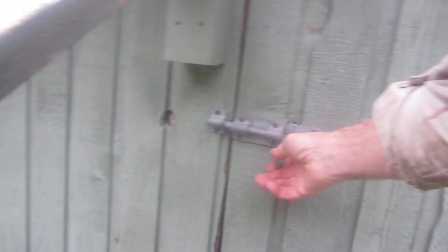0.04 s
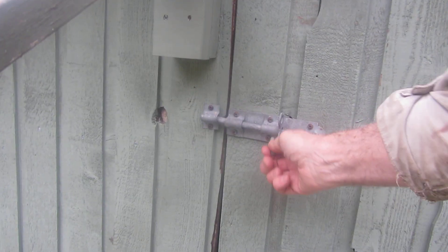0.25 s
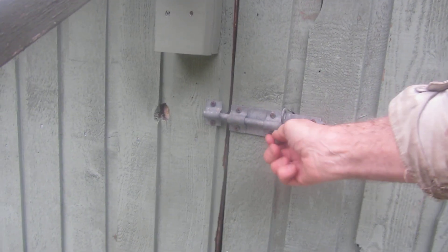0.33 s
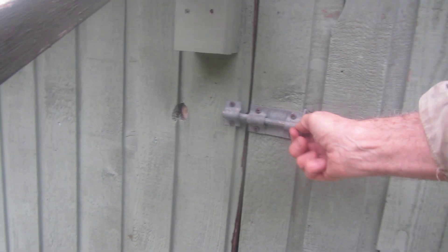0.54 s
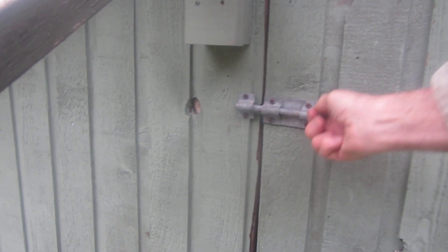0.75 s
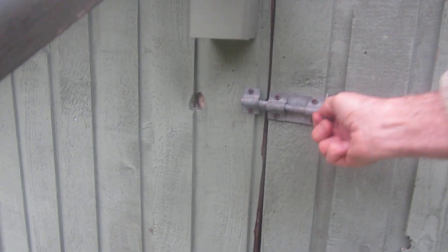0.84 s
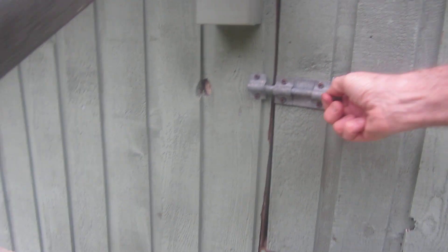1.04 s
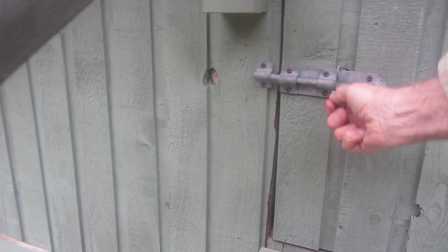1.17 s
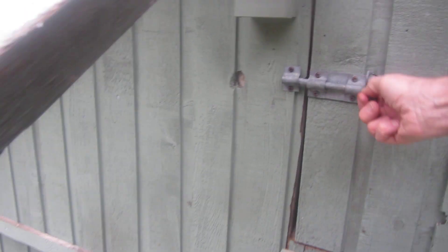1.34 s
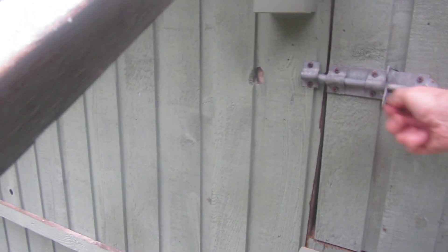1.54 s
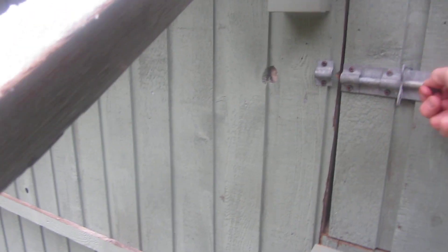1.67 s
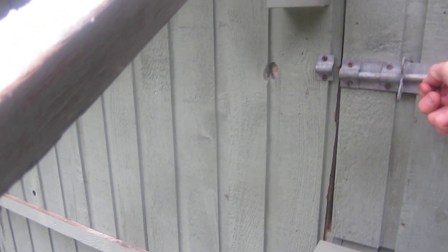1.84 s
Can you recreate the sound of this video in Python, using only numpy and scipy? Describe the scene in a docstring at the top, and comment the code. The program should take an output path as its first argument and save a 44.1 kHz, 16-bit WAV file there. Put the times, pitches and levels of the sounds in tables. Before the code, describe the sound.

A metal slide bolt is worked back by hand on a wooden door outdoors, heard close. It clacks, rattles and scrapes unevenly with tiny squeaks, then ends in a few sharp clicks. The door thuds softly over faint hiss.

```python
"""Outdoors, close to a wooden door: a steel slide bolt is worked back by hand.
The bolt knocks and chatters in its housing and scrapes in tiny slips between knocks. It squeaks
and groans where it binds, pings where it strikes. Knocks and scrape ring the bolt and its board.
The door rumbles under the tugging hand and thuds in its frame. Faint hiss behind."""
import sys
import numpy as np
from scipy import signal
from scipy.io import wavfile

SR = 44100
rng = np.random.default_rng(int(sys.argv[2]) if len(sys.argv) > 2 else 0)


def wrap_up_sound(samples):
    """Save the sound to the file named by the first command line argument, as 16-bit audio."""
    columns = np.atleast_2d(samples).T
    # keep every value between -1 and 1, then stretch to whole-number steps
    tamed = np.clip(columns, -1, 1)
    steps = np.round(tamed * 32767).astype(np.int16)
    wavfile.write(sys.argv[1], SR, steps)


N = 83790
TIME_S = np.arange(N) / SR

# bolt strikes housing: start_s, contact_s, wood_db, clack_db, steel_db, tick_db, top_db
KNOCKS = [(0.2036, 0.0015, -23.5, -26.5, -34, -32, -44), (0.212, 0.024, -29.5, -13, -75, -41, -62),
          (0.2319, 0.0024, -33.5, -13.5, -19, -20, -48), (0.249, 0.0027, -57, -30, -48, -26.5, -37),
          (0.282, 0.011, -50, -26, -36, -57, -64), (0.2988, 0.006, -36.5, -16, -18.5, -35.5, -61),
          (0.375, 0.0021, -25.5, -39, -76, -59, -63), (0.3912, 0.003, -39, -22.5, -27, -49, -47),
          (0.5016, 0.00053, -20.5, -34, -33, -29, -32), (0.519, 0.004, -26.5, -13.5, -40, -39, -42),
          (0.5249, 0.0013, -50, -15.5, -18.5, -22.5, -45), (0.537, 0.003, -30.5, -20.5, -26, -35, -55),
          (0.557, 0.0017, -27, -33.5, -25, -36.5, -70), (0.588, 0.0031, -31, -14, -18.5, -26.5, -39.5),
          (0.695, 0.0018, -39.5, -37, -44.5, -63, -54), (0.729, 0.0017, -24.5, -20, -31.5, -48, -57),
          (0.7432, 0.002, -25, -27.5, -34, -40.5, -70), (0.751, 0.0019, -29, -28.5, -60, -61, -72),
          (0.7699, 0.002, -31, -22.5, -21, -35.5, -57), (0.79, 0.004, -27, -22, -27, -55, -64),
          (0.798, 0.0019, -35, -21, -42, -46, -54), (0.833, 0.0017, -34, -60, -46, -53, -65),
          (0.8508, 0.001, -41, -20.5, -23, -35.5, -60), (0.865, 0.001, -29, -23, -30, -38.5, -53),
          (0.914, 0.0061, -32.5, -14.5, -21.5, -29, -67), (0.95, 0.01, -18, -22, -24, -42.5, -49),
          (0.968, 0.011, -20.5, -16, -27.5, -41.5, -52), (1.0389, 0.0023, -31, -21, -22, -29.5, -46.5),
          (1.054, 0.0023, -25.5, -19.5, -23.5, -46, -49), (1.075, 0.006, -34.5, -30, -65, -43, -66),
          (1.094, 0.0023, -34.5, -40, -38.5, -45, -52), (1.1603, 0.005, -32, -21, -27, -41.5, -45.5),
          (1.201, 0.0041, -26, -17, -18, -21, -57), (1.2364, 0.002, -25, -23.5, -20.5, -30, -52),
          (1.243, 0.0025, -43, -48, -51, -39, -40.5), (1.284, 0.0029, -23, -28.5, -32.5, -53, -67),
          (1.3263, 0.0021, -44, -20, -23.5, -27.5, -30.5), (1.378, 0.0017, -44, -32.5, -36.5, -43, -52),
          (1.4275, 0.0037, -35.5, -30.5, -32, -41.5, -61), (1.451, 0.0027, -37.5, -41.5, -46.5, -74.5, -56),
          (1.479, 0.0037, -34, -43.5, -55, -74, -66), (1.57, 0.01, -39, -32.5, -34.5, -42, -52.5),
          (1.587, 0.017, -28, -27, -30, -43, -48), (1.604, 0.0084, -35, -21, -18, -28, -27),
          (1.612, 0.014, -34, -21.5, -33.5, -28.5, -24.5), (1.631, 0.0048, -39, -27, -19, -24.5, -25),
          (1.693, 0.0054, -35, -24, -31.5, -27.5, -29.5)]
# bands of those five levels: low_hz, high_hz
KNOCK_BANDS = [(200, 650), (650, 1800), (1800, 4000), (4000, 8000), (8000, 16000)]
# fine colour of all knocks: freq_hz, gain_db
KNOCK_COLOUR = [(200, -8), (280, -8.5), (380, -5), (480, -8.5), (700, 0.5), (1000, -4.5), (1450, 1),
                (1900, -2.5), (2500, 2), (3500, -3.5), (5200, 0.5), (7000, -0.5), (9500, -4), (12500, -10),
                (16000, -21.5)]
# knock decay: freq_hz, t60_s
KNOCK_RING = [(200, 0.25), (400, 0.097), (1000, 0.038), (2700, 0.026), (7000, 0.017), (15000, 0.0067)]
# sliding friction: time_s, level_db
SCRAPE_LEVEL = [(.16, -62), (.195, -30), (.22, -19), (.27, -28.5), (.32, -29), (.37, -30.5), (.42, -44),
                (.5, -54.5), (.507, -20.5), (.56, -45), (.65, -53), (.71, -47), (.75, -51), (.81, -32),
                (.9, -59), (.94, -31), (.98, -40), (1.03, -44.5), (1.07, -26), (1.12, -57), (1.158, -50),
                (1.19, -42.5), (1.3, -39.5), (1.36, -52), (1.47, -57.5), (1.55, -67.5), (1.62, -22.5),
                (1.68, -57), (1.75, -65)]
# friction spectrum: freq_hz, density_db
SCRAPE_SPECTRUM = [(200, -25), (450, -8.5), (720, 6), (1000, -7), (1500, -7.5), (2400, -9), (3500, -29),
                   (6000, -24), (10000, -35), (16000, -43)]
# squeaks, groans and metallic pings of the bolt: start_s, length_s, pitch_hz, level_db, octave_db
BOLT_TONES = [(0.231, 0.0048, 3250, -15.5, -25), (0.299, 0.022, 1219, -22.5, -2),
              (0.5004, .001, 5050, -20, -17), (0.528, 0.0066, 2124, -7.5, -22),
              (0.727, 0.0072, 630, -19.5, -18), (0.912, 0.0053, 1531, -17.5, -24),
              (0.916, .004, 4400, -20.5, -30), (.949, 0.0093, 412.8, -16.5, -23),
              (0.9493, 0.0077, 1417, -12.5, -18), (1.039, 0.0055, 1583, -15, -13),
              (1.328, .003, 5400, -22.5, -22)]
# resonances of bolt and its board: freq_hz, gain_db, t60_s
BOLT_MODES = [(356.5, 4.5, 0.27), (392.6, -1, .2), (586, -8.5, .09), (695, -3.5, 0.072), (777, -7.5, 0.089),
              (819, -9, .11), (1027, -1, 0.032), (1344, -7, 0.12), (1532, 1, 0.023), (2027, -3.5, 0.048),
              (2320, -11.5, 0.03), (2440, -22, 0.024), (3110, -5.5, 0.12), (3757, -3, 0.018),
              (4390, -12.5, .03), (5110, -6.5, 0.02), (6070, -4.5, 0.03), (7700, -4.5, .02),
              (9260, 1, .012)]
# bolt position: time_s, left_minus_right_db
BOLT_PAN = [(.25, -1), (.52, -3), (.98, -2.5), (1.25, -3.5), (1.62, -4.4)]
# sway of the whole door: freq_hz, gain_db, t60_s
DOOR_MODES = [(112, -1, 0.24), (166, -4, 0.14)]
# door rumble: time_s, level_db
RUMBLE_LEVEL = [(0, -35), (.06, -57.5), (.17, -53), (.205, -33), (.27, -30.5), (.34, -39.5), (.47, -40.5),
                (.55, -30), (.68, -46), (.82, -31), (.9, -42), (.97, -41), (1.03, -38), (1.1, -36),
                (1.19, -38.5), (1.3, -29.5), (1.37, -49.5), (1.46, -39.5), (1.55, -48.5), (1.62, -36.5),
                (1.74, -64), (1.9, -82)]
# board spectrum: freq_hz, density_db
RUMBLE_SPECTRUM = [(25, -24), (42, -22), (62, -2), (85, 2), (115, -2.5), (170, -1), (250, -10),
                   (380, -32.5), (600, -18), (1200, -47)]
# door shifts in frame: start_s, pitch_hz, level_db
THUDS = [(.255, 114.6, -29), (.425, 203, -25.5), (0.501, 70.5, -33), (0.544, 110, -33), (0.816, 165, -27.5),
         (.95, 65.5, -26), (1.078, 126, -27.5), (1.113, 71, -27.5), (1.236, 65.6, -38), (1.279, 300, -27.5)]
# background hiss: time_s, level_db
HISS_LEVEL = [(0, -43), (.17, -46), (.38, -50), (.5, -55), (.62, -68), (.68, -58.5), (1.1, -55.5),
              (1.36, -56.5), (1.5, -65), (1.56, -66.5), (1.68, -52.5), (1.77, -44), (1.9, -46)]
# hiss spectrum: freq_hz, density_db
HISS_SPECTRUM = [(100, 2.5), (400, 4.5), (900, 0.5), (1600, 1.5), (2400, 3), (3600, -3.5), (6000, -5),
                 (9000, -26.5), (12000, -29), (16000, -43)]
# treble hiss: time_s, level_db
AIR_LEVEL = [(0, -50), (.35, -58), (.6, -70), (.9, -72), (1.3, -67), (1.55, -74.5), (1.8, -63)]
# treble hiss spectrum: freq_hz, density_db
AIR_SPECTRUM = [(3000, -24.5), (6000, -9), (9000, 7.5), (11000, -8), (15000, -3), (17000, -19)]
# left-right likeness of bolt and door: freq_hz, correlation
LIKENESS = [(60, 0.88), (250, 0.91), (1000, 0.79), (2500, 1), (6000, 0.5), (14000, 0.17)]


def knocks():
    """Gritty chatter while the metal touches, then a dense ring that dies fastest in the treble."""
    typical_contact_s, typical_rise_s = 0.0036, 0.00039
    grit, contact_fade_db = 0.83, -1.5
    tail_db, tail_t60_s = -24.5, 0.135
    soft_db_per_doubling, soft_knee_hz = 5.5, 9160
    rows, size = np.array(KNOCKS), SR // 6
    t = np.arange(size) / SR
    contact_s = rows[:, 1, None, None]
    after_s = np.maximum(t - contact_s, 0)
    chatter = rng.standard_normal((len(rows), 2, size))  # knock, mid/side, sample
    chatter *= np.abs(chatter) ** grit
    # longer contact: slower rise, duller top
    rise_s = typical_rise_s * (contact_s / typical_contact_s) ** 2 + 1 / SR
    doublings = np.log2(contact_s.ravel() / typical_contact_s)
    chatter *= np.minimum(t / rise_s, 1) * from_db(contact_fade_db * np.minimum(t / contact_s, 1))
    head = t < contact_s + .006  # span that sets the level
    low_hz, high_hz = np.transpose(KNOCK_BANDS)
    centres_hz = np.sqrt(low_hz * high_hz)
    density_db = rows[:, 2:] - 10 * np.log10(high_hz - low_hz)
    hits = 0
    for k, (hz, width_hz, sos) in enumerate(third_octaves(low_hz=170)):
        decay = from_db(-60 * after_s / at_hz(KNOCK_RING, hz))
        tail = from_db(tail_db - 60 * after_s / tail_t60_s)
        ring = signal.sosfilt(sos, chatter * (decay + tail))
        aligned = np.roll(ring, -int(SR / width_hz / 2), axis=2)  # minus filter delay
        head_power = (aligned ** 2 * head).sum(2, keepdims=True) / head.sum(2, keepdims=True)
        band_db = np.array([np.interp(np.log(hz), np.log(centres_hz), db) for db in density_db])
        band_db += at_hz(KNOCK_COLOUR, hz)
        band_db -= soft_db_per_doubling * doublings * np.clip(2 * np.log2(hz / soft_knee_hz), 0, 1)
        ring *= from_db(band_db)[:, None, None] * np.sqrt(width_hz / head_power)
        hits = hits + (-1) ** k * stereo(ring[:, :1], ring[:, 1:], at_hz(LIKENESS, hz))
    out = np.zeros((2, N + size))
    for start, hit in zip((rows[:, 0] * SR).astype(int), hits):
        out[:, start:start + size] += hit
    return out[:, :N]


def scrape(slips_per_s=7000, spread_db=4):
    """Dense tiny slips of the bolt along its guides."""
    slips = rng.random(N) < slips_per_s / SR
    strength = from_db(spread_db * np.minimum(rng.exponential(1, N), 4))
    friction = slips * strength * rng.standard_normal((2, N))
    return envelope(SCRAPE_LEVEL) * coloured(friction, SCRAPE_SPECTRUM, LIKENESS)


def bolt_tones(sag=0.044, rise_s=0.00079, release_s=.0016):
    """Short tones: squeaks and groans where the bolt binds, high metallic pings where it strikes."""
    out = np.zeros(N)
    for start_s, length_s, pitch_hz, level_db, octave_db in BOLT_TONES:
        t = np.maximum(TIME_S - start_s, 0)
        glide_hz = pitch_hz * (1 - sag * np.minimum(t / length_s, 1))
        phase = 2 * np.pi * np.cumsum(glide_hz) / SR + rng.uniform(0, 2 * np.pi)
        swell = np.minimum(t / rise_s, 1) * np.exp(-np.maximum(t - length_s, 0) / release_s)
        out += from_db(level_db) * swell * (np.sin(phase) + from_db(octave_db) * np.sin(2 * phase))
    return out


def resonate(drive, modes, trim_db=-3):
    """Bolt or door rings at its resonances, added to the direct sound."""
    out = drive.copy()
    for hz, gain_db, t60_s in modes:
        radius = from_db(-60 / (t60_s * SR))
        zeros = np.array([1, 0, -1]) * (1 - radius ** 2) / 2
        poles = [1, -2 * radius * np.cos(2 * np.pi * hz / SR), radius ** 2]
        out += from_db(gain_db) * signal.lfilter(zeros, poles, drive + 1e-18)
    return from_db(trim_db) * out


def rumble():
    """The boards rumble as the hand tugs at the bolt."""
    return shaped_noise(RUMBLE_LEVEL, RUMBLE_SPECTRUM, LIKENESS)


def thuds(rise_s=0.0083, t60_s=0.18):
    """Each shift of the door swings one low board resonance."""
    out = np.zeros(N)
    for start_s, pitch_hz, level_db in THUDS:
        t = np.maximum(TIME_S - start_s, 0)
        swing = np.minimum(t / rise_s, 1) * from_db(level_db - 60 * t / t60_s)
        out += swing * np.sin(2 * np.pi * pitch_hz * t)
    return out


def hiss(correlation=0.18):
    """Faint wide hiss with an airy top, lower while the bolt moves."""
    flat = [(1000, correlation)]
    return shaped_noise(HISS_LEVEL, HISS_SPECTRUM, flat) + shaped_noise(AIR_LEVEL, AIR_SPECTRUM, flat)


def from_db(db):
    """Decibels to gain."""
    return 10 ** (np.asarray(db) / 20)


def at_hz(points, hz):
    """Table value on a log-frequency axis."""
    freq_hz, value = np.transpose(points)
    return np.interp(np.log(hz), np.log(freq_hz), value)


def envelope(curve):
    """Gain over time from a dB curve."""
    return from_db(np.interp(TIME_S, *np.transpose(curve)))


def third_octaves(low_hz):
    """Filter bank from low_hz up: centre_hz, width_hz, sos."""
    edges_hz = 22 * 2 ** (np.arange(30) / 3)
    return [(np.sqrt(a * b), b - a, signal.butter(2, [a, b], "band", fs=SR, output="sos"))
            for a, b in zip(edges_hz, edges_hz[1:]) if a >= low_hz]


def stereo(mid, side, correlation):
    """Mid and side to left and right at a given correlation."""
    signed_side = side * np.array([[1], [-1]])
    return (np.sqrt(1 + correlation) * mid + np.sqrt(1 - correlation) * signed_side) / np.sqrt(2)


def pan(x, db):
    """Left exceeds right by db."""
    return x * from_db([[db / 2], [-db / 2]])


def coloured(mid_side, spectrum, likeness):
    """Mid and side shaped band by band into stereo, rms 1."""
    out = 0
    for k, (hz, _, sos) in enumerate(third_octaves(low_hz=0)):
        if hz < spectrum[-1][0] * np.sqrt(2):
            band = stereo(*signal.sosfilt(sos, mid_side), at_hz(likeness, hz))
            out = out + (-1) ** k * from_db(at_hz(spectrum, hz)) * band
    return out / np.sqrt(np.mean(out ** 2) + 1e-20)


def shaped_noise(curve, spectrum, likeness):
    """Coloured stereo noise following a dB curve."""
    return envelope(curve) * coloured(rng.standard_normal((2, N)), spectrum, likeness)


def scene(left_lag_s=.000062):
    """Bolt, door, hiss. The bolt sits slightly right: later and softer on the left."""
    left, right = resonate(knocks() + scrape(), BOLT_MODES) + bolt_tones()
    late_left = np.interp(TIME_S - left_lag_s, TIME_S, left)
    lean = np.sqrt(envelope(BOLT_PAN))
    bolt = np.array([late_left * lean, right / lean])
    door = resonate(rumble(), DOOR_MODES) + thuds()
    return bolt + pan(door, db=-1.5) + pan(hiss(), db=-2)


def record(dry):
    """Microphone: bass cut, treble shelf, rounded peaks, top cut."""
    bass_cut_hz, top_cut_hz = 21, 16200
    shelf_hz, shelf_db, ceiling = 10280, -9, 0.74
    thinned = signal.sosfilt(signal.butter(2, bass_cut_hz, "high", fs=SR, output="sos"), dry)
    below_shelf = signal.sosfiltfilt(signal.butter(6, shelf_hz, fs=SR, output="sos"), thinned)
    shelved = below_shelf + from_db(shelf_db) * (thinned - below_shelf)
    rounded = ceiling * np.tanh(shelved / ceiling)
    return signal.sosfilt(signal.ellip(10, .1, 80, top_cut_hz, fs=SR, output="sos"), rounded)


dry = scene()
out = record(dry)
wrap_up_sound(out)
```